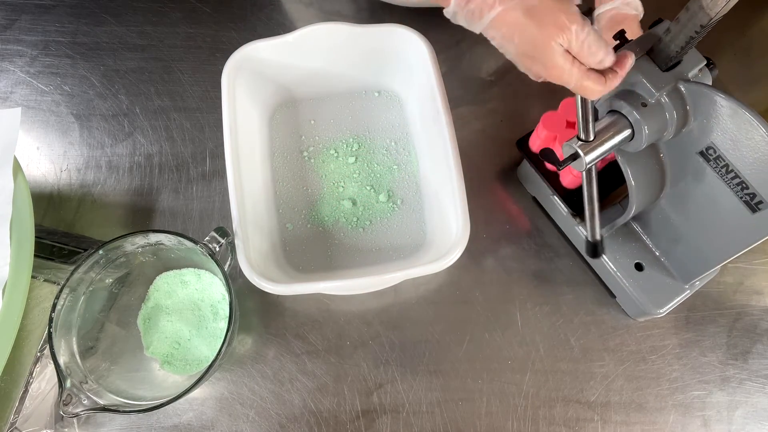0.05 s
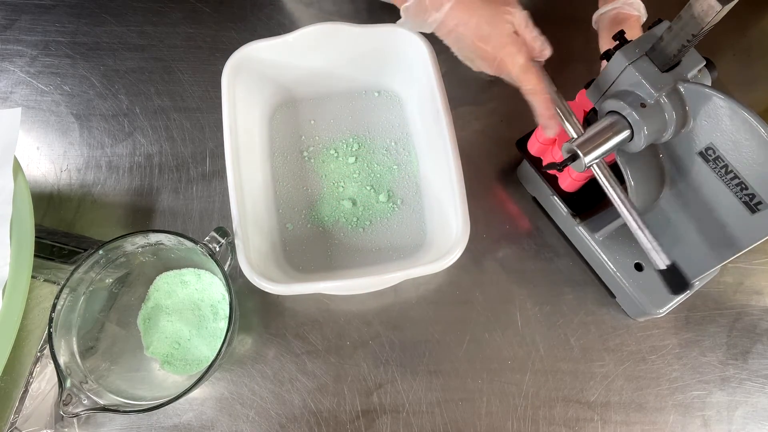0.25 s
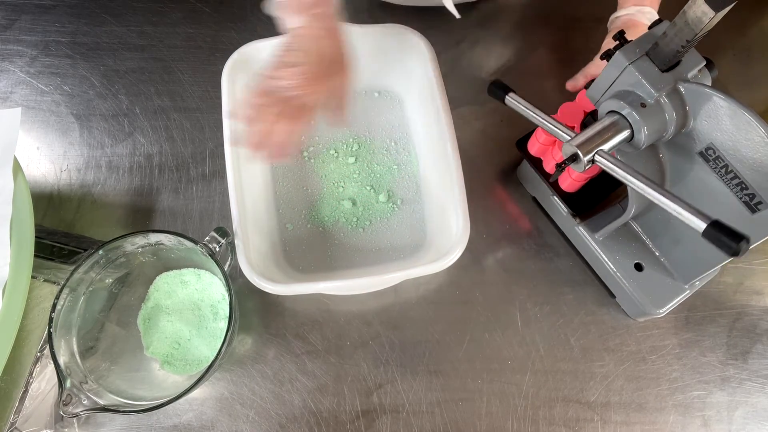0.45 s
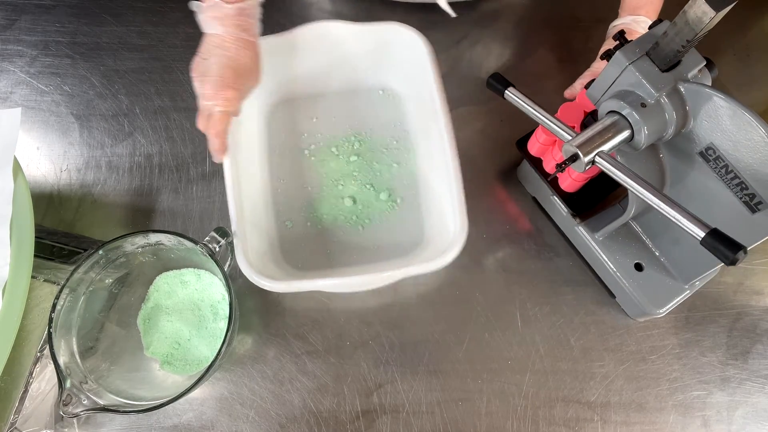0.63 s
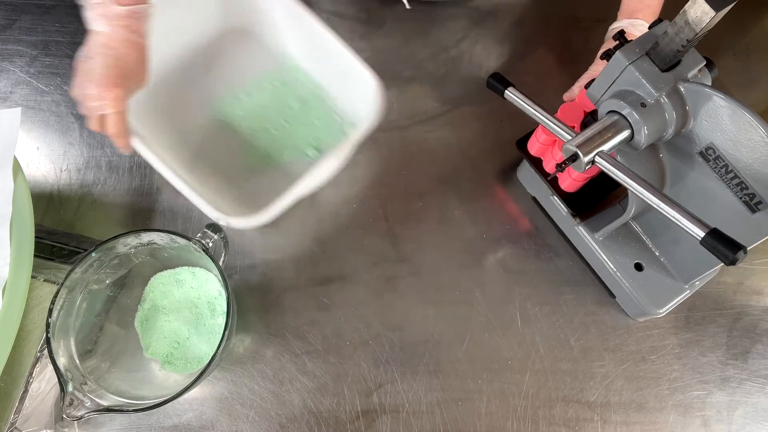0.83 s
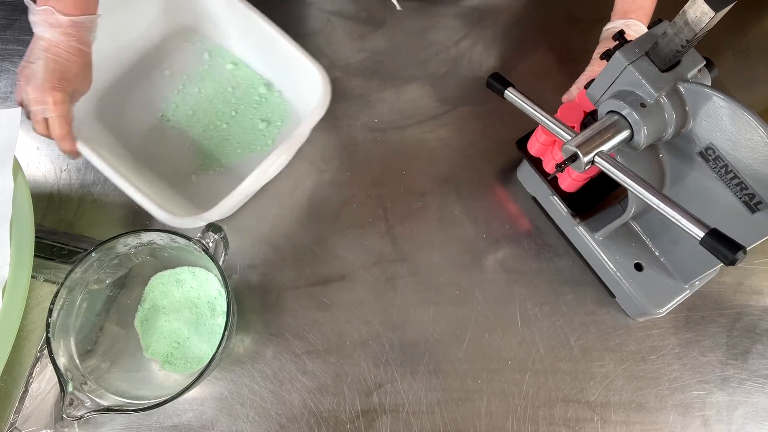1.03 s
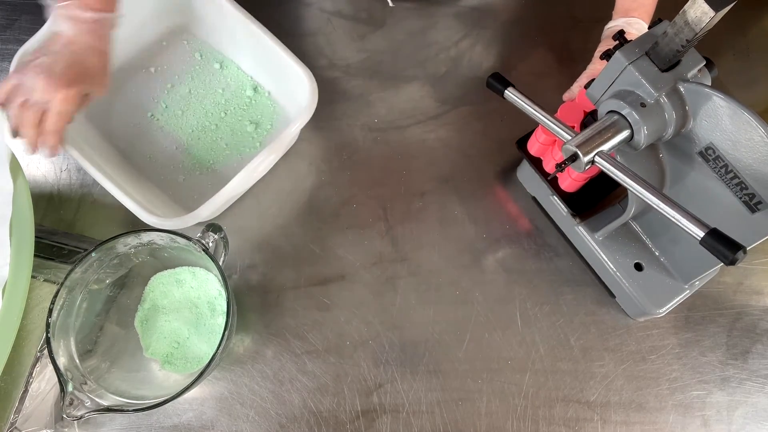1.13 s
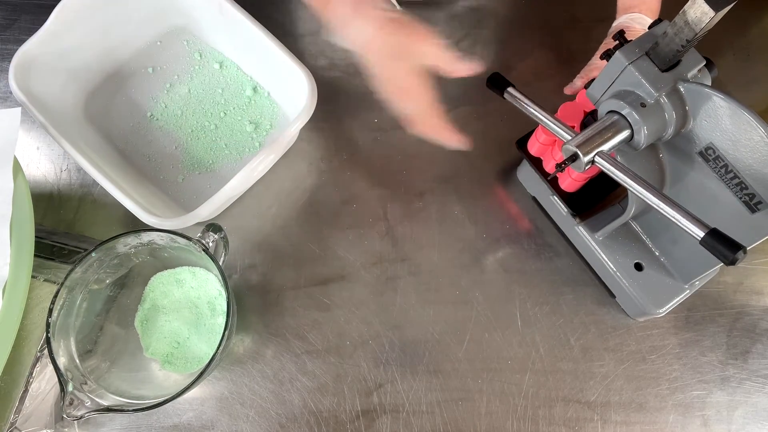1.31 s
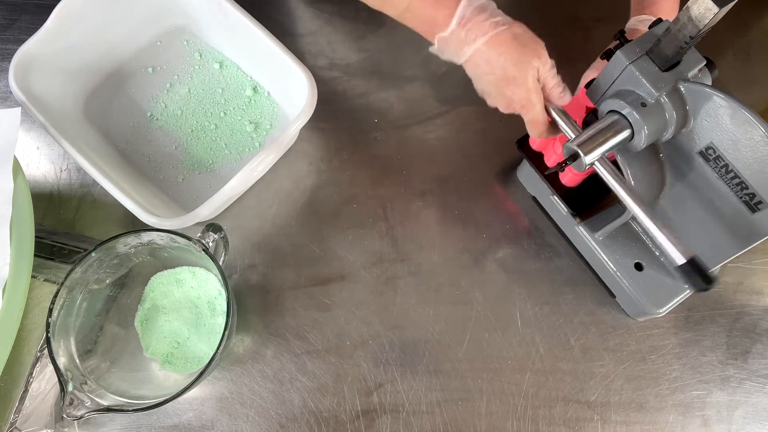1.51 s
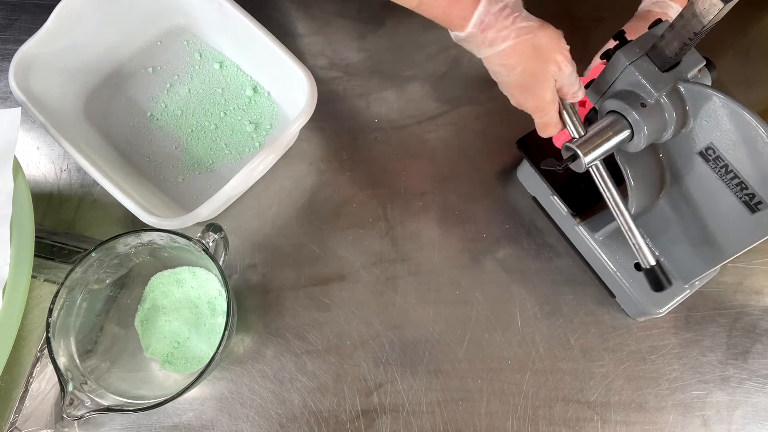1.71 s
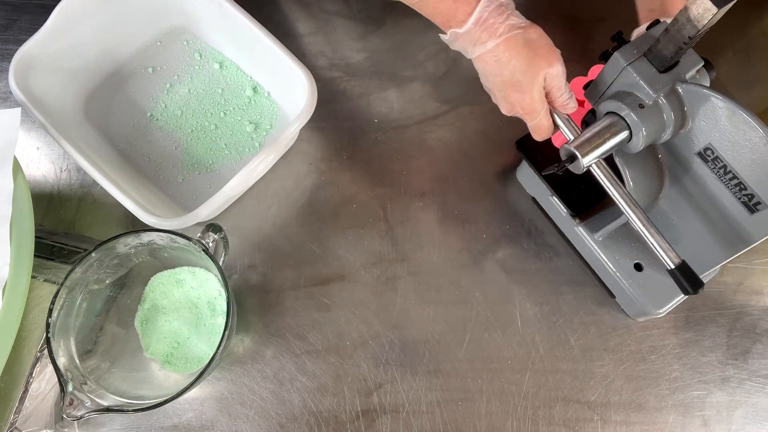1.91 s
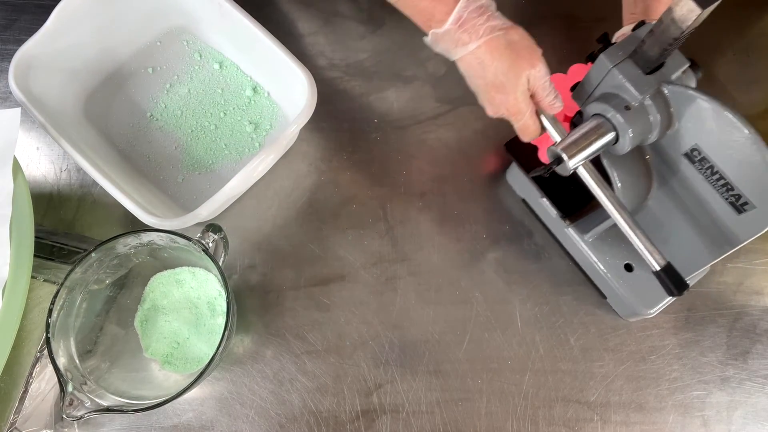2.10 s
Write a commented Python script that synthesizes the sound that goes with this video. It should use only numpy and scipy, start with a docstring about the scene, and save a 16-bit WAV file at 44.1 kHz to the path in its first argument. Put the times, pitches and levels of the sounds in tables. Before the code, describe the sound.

Sharp plastic clack in a small press, then hollow tub knocks, a juddering drag and sliding powder

```python
"""A hard plastic mold clacks in a small lever press on a steel table, close to two microphones.
Clacks and knocks ring decaying modes and dense noise bursts; below the clack the table booms.
A gloved hand knocks a plastic tub and drags it aside: its base judders in stick-slip jerks, and loose
powder, made of tiny random impacts, slides across the bottom. Back at the press, the lever judders and
shakes the tub through the table. A low hum of narrow noise fills the small, hard room."""
import sys
import numpy as np
from scipy import signal
from scipy.fft import rfft, irfft
from scipy.io import wavfile
from scipy.ndimage import uniform_filter1d

SR = 44100
rng = np.random.default_rng(int(sys.argv[2]) if len(sys.argv) > 2 else 0)


def put_to_file(sound):
    """Save the sound as 16-bit audio at rate SR, in the file named by the first command-line argument."""
    columns = np.atleast_2d(sound).T  # one column per channel
    safe = np.clip(columns, -1, 1)
    whole_steps = np.round(safe * 32767)
    wavfile.write(sys.argv[1], SR, whole_steps.astype(np.int16))


N = 94815
TIME = np.arange(N) / SR
HZ = np.fft.rfftfreq(2 * N, 1 / SR)  # padded to twice the length, so that filters do not wrap around
RING_TIME = TIME[:SR // 2]  # each struck sound is half a second long


def amp(db):
    """Decibels to gain."""
    return 10 ** (np.asarray(db) / 20)


def unit(x):
    """Scales to rms 1."""
    return x / np.sqrt(np.mean(x ** 2) + 1e-20)


def read(points, hz):
    """Reads a table on a log-frequency axis."""
    f, value = np.transpose(points)
    return np.interp(np.log(hz + 1), np.log(f + 1), value)


def shaped(x, gain):
    """Filters by a gain for each frequency."""
    return irfft(rfft(x, 2 * N) * gain)[..., :N]


def add(mix, start_s, sound):
    """Mixes a sound in at a time."""
    part = mix[max(round(start_s * SR), 0):][:len(sound)]
    part += sound[:len(part)]


# Phase between the microphones. Each row: frequency in Hz, lead of the left microphone in radians.
MIC_PHASE = [(0, -0.5), (2330, 0.27), (3790, 0.5), (5600, 0.1), (12400, -2), (14100, -3.5), (15300, -2.5)]
# Decay of the room. Each row: frequency in Hz, time to fall 60 dB in seconds.
ROOM_T60 = [(100, 0.46), (500, 0.31), (1200, 0.15), (2500, 0.31), (6000, 0.2), (14000, 0.18)]
ROOM_GAP_S = 0.005  # from the direct sound to the start of the reflections


def room(x, wet_db):
    """Direct sound at two close microphones, plus sparse reflections dying by band."""
    spacing, length = 22, SR // 2  # samples: one reflection falls at random in each slot
    slots = np.arange(0, length, spacing)
    at = slots + rng.integers(0, spacing, (2, len(slots)))
    taps = np.zeros((2, length + spacing))
    np.put_along_axis(taps, at, rng.choice([-1., 1.], at.shape), 1)
    hz, t, z = signal.stft(taps, SR, nperseg=256)
    # The two microphones share the low reflections and hear separate high ones.
    same = np.exp(-hz / 700)[:, None]
    z[1] = same * z[0] + np.sqrt(1 - same ** 2) * z[1]
    decay = amp(-60 * t / read(ROOM_T60, hz)[:, None])
    tail = signal.istft(z * decay, SR, nperseg=256)[1]
    tail = np.pad(tail / np.linalg.norm(tail[0]), ((0, 0), (round(ROOM_GAP_S * SR), 0)))
    left = shaped(x, np.exp(1j * read(MIC_PHASE, HZ)))
    direct = np.array([left, x])
    return direct + amp(wet_db) * signal.fftconvolve(x[None], tail, axes=1)[:, :N]


def ring(modes):
    """Decaying sines of a struck object."""
    t = RING_TIME
    return sum(amp(db - 60 * t / t60) * np.sin(2 * np.pi * hz * t) for hz, db, t60 in modes)


def burst(colour, db, t60):
    """A dying burst of dense ringing: coloured noise under an exponential decay."""
    hz = np.fft.rfftfreq(len(RING_TIME), 1 / SR)
    noise = rfft(rng.standard_normal(len(RING_TIME)))
    return unit(irfft(noise * amp(read(colour, hz)))) * amp(db - 60 * RING_TIME / t60)


def body(modes, crack, crack_db, crack_t60):
    """Response to a blow: clear modes plus a burst of dense ones."""
    return 0.5 * (ring(modes) + burst(crack, crack_db, crack_t60))


def struck(modes):
    """The modes weighted anew, as if excited from a random spot."""
    spot_db = 2
    return [(hz, db + spot_db * rng.standard_normal(), t60) for hz, db, t60 in modes]


def contact(x, hard_hz, low_hz):
    """A soft contact loses treble; a light one on the rim loses bass."""
    x = signal.lfilter(*signal.butter(2, min(hard_hz, SR / 2 - 100), fs=SR), x)
    return signal.lfilter(*signal.butter(2, low_hz, "high", fs=SR), x)


def grains(level, colour, per_s, spread_db):
    """Tiny impacts of random size, in small clumps, under a level curve."""
    patch_db, patch_s = 2.4, 0.0089
    size = amp(spread_db * np.minimum(rng.exponential(1, N), 5)) * rng.choice([-1., 1.], N)
    patches = unit(uniform_filter1d(rng.standard_normal(N), max(round(patch_s * SR), 2)))
    size *= amp(patch_db * patches)
    impacts = size * (rng.random(N) < per_s / SR)
    clicks = unit(shaped(impacts, amp(read(colour, HZ))))
    return clicks * amp(np.interp(TIME, *np.transpose(level), left=-np.inf, right=-np.inf))


# Colour of the room air. Each row: frequency in Hz, relative density in dB per Hz.
AIR = [(20, -22), (64, -28.5), (150, -2.5), (240, -8), (400, -15.5), (830, -15), (1300, -26.5),
       (2300, -27.5), (4400, -54.5), (7500, -44.5), (11000, -52.5), (15500, -64)]
# The low hum. Each row: frequency in Hz, level in dB, width in Hz.
HUM = [(63.7, -55, 32)]
AIR_DB = -65
TONE_HZ, TONE_DB = 238, -61.5


def background():
    """Room air as noise partly shared by both sides, a wavering low hum and a faint steady tone."""
    own, common = rng.standard_normal((2, N)), rng.standard_normal(N)
    air = unit(shaped(own * 0.5 + common, amp(read(AIR, HZ))))
    hum = np.zeros(N)
    for hz, db, width in HUM:
        resonance = 1 / (1 + (2 * (HZ - hz) / width) ** 2)
        hum += amp(db) * unit(shaped(rng.standard_normal(N), resonance))
    tone = unit(np.sin(2 * np.pi * TONE_HZ * TIME))
    return amp(AIR_DB) * air + hum + amp(TONE_DB) * tone


# Dull scraping on the table top. Each row: time in seconds, level in dB.
SCRAPE_RUB = [(0, -44), (.04, -54), (.1, -63), (.19, -50), (.39, -60), (.43, -57), (.48, -58), (.53, -58),
              (.7, -47.5), (.76, -45.5), (.85, -44), (.91, -58), (1.0, -53.5), (1.07, -52), (1.21, -53),
              (1.25, -50), (1.3, -55.5), (1.37, -72.5), (1.52, -86.5), (1.555, -58.5), (1.7, -53.5),
              (1.8, -57), (1.87, -63.5), (2.07, -65), (2.15, -55)]
# Its colour. Each row: frequency in Hz, relative density in dB per Hz.
SCRAPE = [(60, 13.5), (150, 6.5), (400, 7.5), (700, -2.5), (900, 1), (1500, -0.5), (2200, 1), (3500, -6.5),
          (6000, -16.5), (15000, -26.5)]


def scrape():
    """Dull scraping on the table top: sparse impacts of uneven size."""
    return grains(SCRAPE_RUB, SCRAPE, per_s=1900, spread_db=1.5)


# Rustle of the glove. Each row: time in seconds, level in dB.
GLOVE_RUB = [(0, -48.5), (.03, -58.5), (.075, -54.5), (.1, -63.5), (.17, -54.5), (.27, -56), (.34, -69.5),
             (1.48, -83.5), (1.55, -60), (1.61, -61.5), (1.69, -46.5), (1.76, -56), (1.85, -65),
             (1.96, -64.5), (2.01, -60), (2.07, -68), (2.105, -49), (2.15, -61)]
# Its colour. Each row: frequency in Hz, relative density in dB per Hz.
GLOVE = [(300, 22.5), (1000, -32.5), (2000, -34), (4000, 5.5), (7000, 6.5), (10000, -1), (13000, -2.5),
         (15500, -37)]


def glove():
    """The glove rustles: dense impacts that differ in size only by clump."""
    return grains(GLOVE_RUB, GLOVE, per_s=6000, spread_db=0.0)


# Hard edges, glove and powder lumps tick on plastic. Each row: start in seconds, level in dB.
TICKS = [(0.2051, -29), (0.2076, -30.5), (0.586, -41.5), (0.656, -47), (.698, -45), (0.76, -41.5),
         (0.769, -36.5), (0.78, -32.5), (.929, -40), (1.096, -47), (1.246, -48.5), (2.037, -52.5),
         (2.104, -51)]
# Their colour. Each row: frequency in Hz, relative density in dB per Hz.
TICK = [(300, -17), (2000, -7), (4000, 1), (7500, -4.5), (10000, -10), (13300, -11), (15000, -34)]
# Colour of one faint, thin tick in the hush. Each row: frequency in Hz, relative density in dB per Hz.
THIN_TICK = [(1000, -25.5), (3300, -12), (5000, -20), (7200, 1), (8400, -9), (10000, -16), (15000, -30.5)]


def ticks():
    """Short bright snaps: bursts of fresh noise, each a little different."""
    out = np.zeros(N)
    for start_s, db in TICKS:
        add(out, start_s, burst(TICK, db, t60=0.016))
    add(out, 1.439, burst(THIN_TICK, db=-60.5, t60=0.047))
    return out


# Powder sliding in the tub. Each row: time in seconds, level in dB.
POWDER_FLOW = [(.62, -56), (.66, -63.5), (.745, -56), (.775, -51), (.794, -36.5), (.804, -33),
               (.818, -38.5), (.848, -29), (.861, -30), (.885, -42.5), (.916, -45), (.93, -37.5),
               (.965, -44), (1.005, -39), (1.03, -57), (1.086, -59), (1.098, -43), (1.132, -60.5),
               (1.158, -47), (1.208, -61.5), (1.265, -63.5), (1.33, -106.5)]
# Its colour. Each row: frequency in Hz, relative density in dB per Hz.
POWDER = [(100, -14), (500, -22.5), (900, -7), (1500, -14), (2100, -6), (4000, -3.5), (8000, -2),
          (11000, -6), (13000, -8), (15500, -37)]
LUMPS_DB = -13.5  # relative to the fine powder


def powder():
    """Loose powder slides across the tub's bottom as fine grains, and sparser lumps tumble among it."""
    fine = grains(POWDER_FLOW, POWDER, per_s=14000, spread_db=-1)
    lumps = amp(LUMPS_DB) * grains(POWDER_FLOW, POWDER, per_s=820, spread_db=4)
    return fine + lumps


def rubbing():
    """Powder and ticks, then glove and scraping, each pair with its own reflections."""
    return room(powder() + ticks(), wet_db=-3) + room(glove() + scrape(), wet_db=-3.5)


# The mold is handled in the press. Each row: start in seconds, level in dB, pitch in Hz.
BUMPS = [(.012, -41.5, 663), (0.119, -44.5, 606), (0.191, -36, 524), (.351, -31.5, 568), (.416, -32.5, 402),
         (.464, -32, 590), (0.483, -35, 343), (0.517, -37.5, 420)]
BUMP_RISE_S, BUMP_T60_S = 0.0017, 0.038
UNDERTONE_RATIO, UNDERTONE_DB = 0.606, -3  # second pitch, relative to the first


def bumps():
    """Soft pushes that ring briefly at two low pitches."""
    out = np.zeros(N)
    rise = np.minimum(RING_TIME / BUMP_RISE_S, 1)
    for start_s, db, hz in BUMPS:
        modes = [(hz, 0, BUMP_T60_S), (hz * UNDERTONE_RATIO, UNDERTONE_DB, BUMP_T60_S)]
        add(out, start_s, amp(db) * rise * ring(modes))
    return room(out, wet_db=-2)


# Light taps on the steel handle. Each row: start in seconds, level in dB.
HANDLE_TAPS = [(1.567, -51.5), (1.592, -57), (2.098, -50.5), (2.108, -53), (2.138, -56)]
# Modes of the handle. Each row: frequency in Hz, level in dB, time to fall 60 dB in seconds.
HANDLE = [(1646, -2, 0.14), (2000, -8, 0.077), (2100, -7, 0.1), (3330, -12, .08), (4300, -10, 0.085),
          (5900, -9, 0.041)]


def handle():
    """Fingers meet the press handle, whose steel modes clink faintly."""
    out = np.zeros(N)
    for start_s, db in HANDLE_TAPS:
        add(out, start_s, amp(db) * ring(struck(HANDLE)))
    return room(out, wet_db=-4)


def slips(curve, jitter):
    """Stick-slip: uneven jerks whose pace and force follow the curve, slow slips pushing longer."""
    slip_share = 0.26  # length of each push, as a share of the curve's slip cycle
    s, rate, db = np.transpose(curve)
    wobble = unit(uniform_filter1d(rng.standard_normal(N), 200))
    pace = np.interp(TIME, s, rate, 0, 0) * np.exp(jitter * wobble)
    turns = np.cumsum(pace) / SR
    out = np.zeros(N)
    for at in TIME[1:][np.diff(np.floor(turns)) > 0]:
        push = np.hanning(max(round(slip_share * SR / np.interp(at, s, rate)), 3))
        add(out, at, push / push.sum() * amp(np.interp(at, s, db)))
    return out


# The base sticks and slips on the table. Each row: time in seconds, slips per second, level in dB.
DRAG = [(.632, 290, -35.5), (.652, 285, -25.5), (.664, 250, -35.5), (.675, 110, -37.5), (.69, 112, -36.5),
        (.712, 85, -38), (.75, 80, -38), (.79, 56, -58)]
# The turning press lever judders and shakes the tub through the table.
# Each row: time in seconds, slips per second, level in dB.
LEVER_JUDDER = [(1.563, 326, -31), (1.578, 309, -31), (1.607, 295, -34), (1.618, 277, -58),
                (1.66, 300, -42), (1.70, 290, -47), (1.75, 275, -47), (1.79, 270, -45.5), (1.89, 236, -54)]
# Knocks on the tub, then, from 1.564 s on, jolts reaching it from the lever through the table.
# Each row: start in seconds, level in dB, hardness in Hz, lowest frequency in Hz.
TUB_JOLTS = [(0.538, -35, 1463, 732), (0.567, -21.5, 5400, 1100), (.574, -27.5, 1510, 354),
             (.584, -28, 5000, 443), (0.59, -25, 3030, 296), (.6175, -18, 1380, 960),
             (0.6201, -13, 1594, 1000), (0.626, -25.5, 1410, 810), (0.635, -22, 1230, 706),
             (.69, -31, 1630, 1120), (.761, -33.5, 3020, 987), (1.564, -34.5, 1590, 654),
             (1.575, -25, 1140, 250), (1.593, -32, 1980, 313), (1.624, -28, 686, 296),
             (1.66, -28, 620, 450), (1.701, -36.5, 1630, 710), (1.777, -38.5, 1100, 294)]
# Modes of the tub. Each row: frequency in Hz, level in dB, time to fall 60 dB in seconds.
TUB = [(186, -17, 0.15), (260, -13.5, 0.12), (339, -8, 0.13), (469, -7, 0.071), (553, -3, 0.056),
       (613, -3.5, 0.076), (1000, -5.5, 0.038), (1292, -10, 0.059), (1416, -3, 0.039), (1615, -20, .025),
       (2640, -14.5, 0.14), (3080, -21.5, 0.072), (4080, -7, 0.05), (5950, -8, .01)]
# Its dense upper ringing. Each row: frequency in Hz, relative density in dB per Hz.
TUB_CRACK = [(100, 13.5), (400, 3), (620, 3), (780, -5.5), (1050, -2.5), (1500, -1), (2500, -7),
             (3700, -10.5), (5000, -33), (7000, -18.5), (15000, -42.5)]
# The tub's bottom flexes as it tilts. Each row: start in seconds, level in dB.
FLEXES = [(0.571, -37.5), (0.625, -36), (0.6671, -24), (.706, -31.5)]
# Modes of the bottom. Each row: frequency in Hz, level in dB, time to fall 60 dB in seconds.
BOTTOM = [(75, -4, 0.3), (181.8, 0, 0.19), (210, -10.5, 0.2), (253, -2.5, 0.08)]
FLEX_RISE_S = 0.002


def tub():
    """Knocks, dragging and the lever's judder and jolts ring the walls; the bottom flexes with a thump."""
    crack = dict(crack=TUB_CRACK, crack_db=2, crack_t60=0.076)
    judder = slips(DRAG, jitter=0.08) + slips(LEVER_JUDDER, jitter=0.1612)
    walls = signal.fftconvolve(judder, body(TUB, **crack))[:N]
    for start_s, db, hard_hz, low_hz in TUB_JOLTS:
        response = body(struck(TUB), **crack)
        add(walls, start_s, amp(db) * contact(response, hard_hz, low_hz))
    thump = np.zeros(N)
    rise = np.minimum(RING_TIME / FLEX_RISE_S, 1)
    for start_s, db in FLEXES:
        add(thump, start_s, amp(db) * ring(BOTTOM) * rise)
    return room(walls, wet_db=-4) + room(thump, wet_db=-5.5)


# Mold against press. Each row: start in seconds, level in dB, hardness in Hz.
CLACKS = [(.008, -43, 4130), (.07, -42.5, 5060), (0.197, -30, 3560), (.2047, -19.5, 3200),
          (.2058, -13, 4400), (.2074, -13.5, 8040), (.2087, -21, 2950), (0.213, -17, 1480),
          (0.416, -42, 2500), (2.101, -41, 2530), (2.14, -40, 4000)]
# Modes of mold and press. Each row: frequency in Hz, level in dB, time to fall 60 dB in seconds.
MOLD = [(338, -12, 0.16), (473, -12.5, 0.15), (533, -19, 0.12), (600, -3, 0.062), (915, -11.5, 0.066),
        (1024, -4, 0.014), (1418, -2.5, 0.012), (1939, -4.5, 0.028), (2070, -3.5, 0.016),
        (2320, -10, 0.058), (3195, -16, 0.05), (4205, -3.5, 0.036), (6060, -5, 0.018)]
# Their dense, short crack. Each row: frequency in Hz, relative density in dB per Hz.
MOLD_CRACK = [(100, -32.5), (350, 1.5), (580, -6.5), (740, -12.5), (1500, -3.5), (2600, 6.5), (4200, -1),
              (7000, -35), (12000, -17.5), (16000, -41.5)]
# Boom of the table. Each row: frequency in Hz, level in dB, time to fall 60 dB in seconds.
TABLE = [(61.5, -33.5, 0.92), (105, -43, 0.3), (248.7, -46, 0.14)]
TABLE_START_S = 0.212


def mold():
    """Quick contacts make one hard clack, with faint ones around it; the table booms below it."""
    out = np.zeros(N)
    for start_s, db, hard_hz in CLACKS:
        response = body(MOLD, MOLD_CRACK, crack_db=-2.5, crack_t60=0.023)
        add(out, start_s, amp(db) * contact(response, hard_hz, low_hz=223))
    add(out, TABLE_START_S, ring(TABLE))
    return room(out, wet_db=-4)


# Balance of the microphones. Each row: frequency in Hz, left minus right in dB.
BALANCE_DB = [(60, -0.5), (110, -2.5), (200, -2), (380, -6.5), (700, -5.5), (1290, -3), (2380, 1.5),
              (4400, 1.0), (8120, 0.5), (15000, 0)]


def scene():
    """All sources before the two microphones; the low middle leans to the right."""
    lean = read(BALANCE_DB, HZ) / 2
    press = mold() + handle() + bumps()
    return shaped(press + tub() + rubbing() + background(), amp([lean, -lean]))


def record(dry):
    """The recorder's low cut and upper band limit."""
    low_cut_hz, edge_hz = 61.7, 15700
    dry = signal.lfilter(*signal.butter(2, low_cut_hz, "high", fs=SR), dry)
    band_limit = signal.firwin(511, edge_hz, window=("kaiser", 9), fs=SR)
    return signal.oaconvolve(dry, band_limit[None], "same")


dry = scene()
out = record(dry)
put_to_file(out)
```